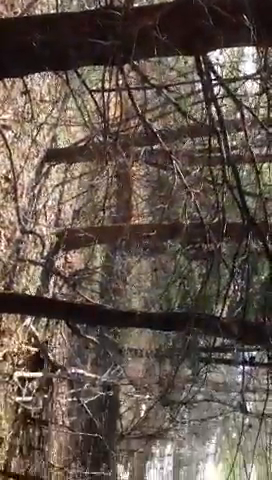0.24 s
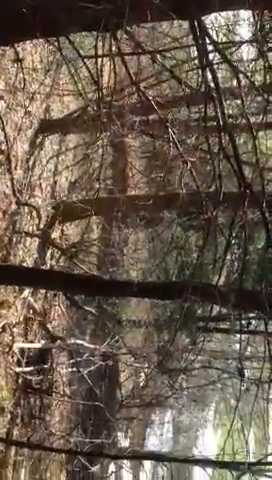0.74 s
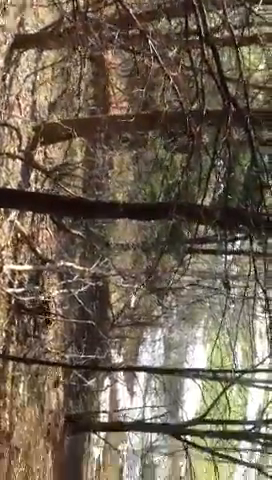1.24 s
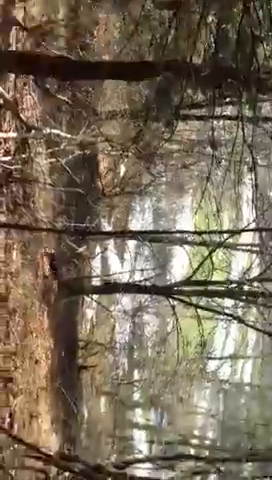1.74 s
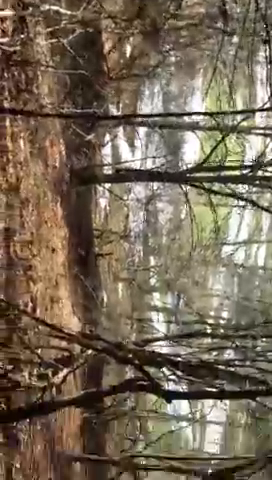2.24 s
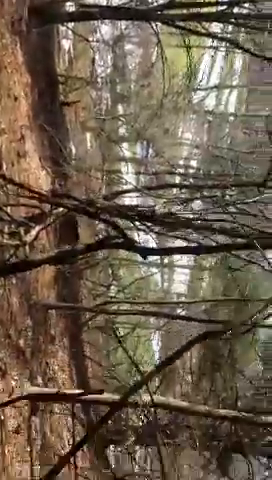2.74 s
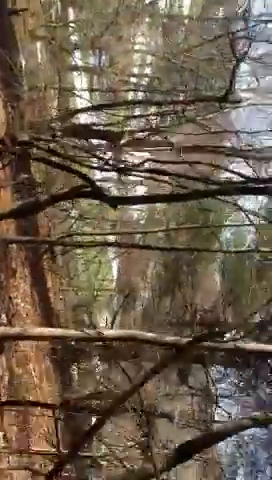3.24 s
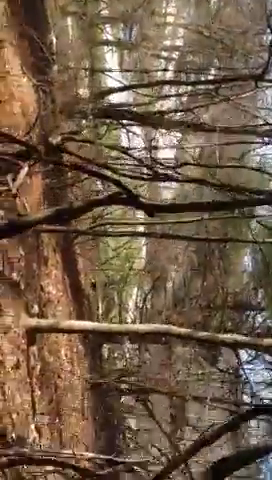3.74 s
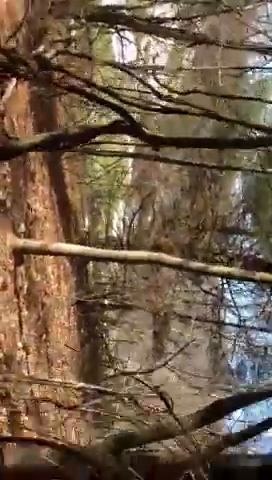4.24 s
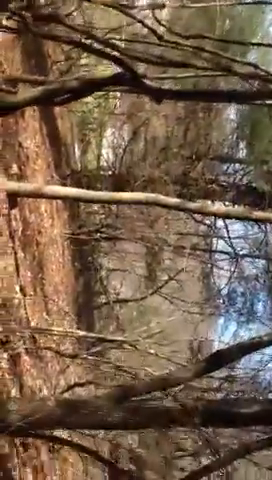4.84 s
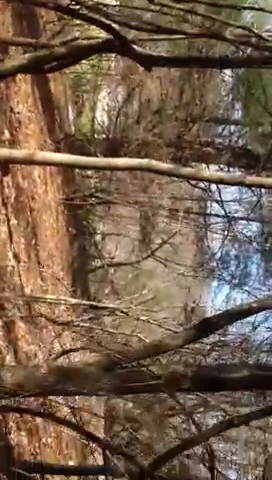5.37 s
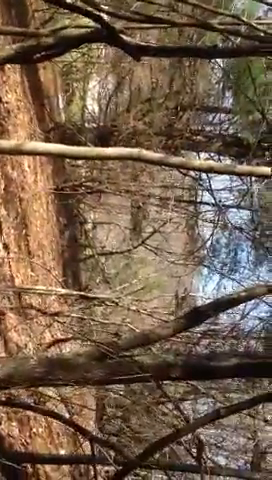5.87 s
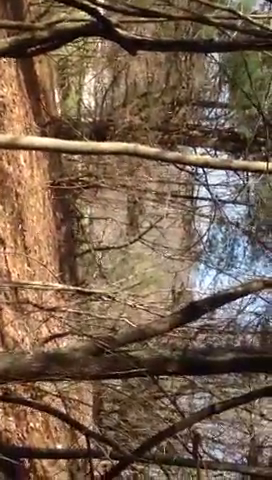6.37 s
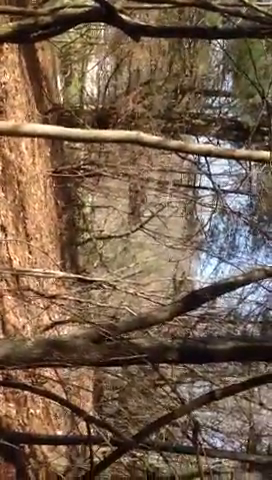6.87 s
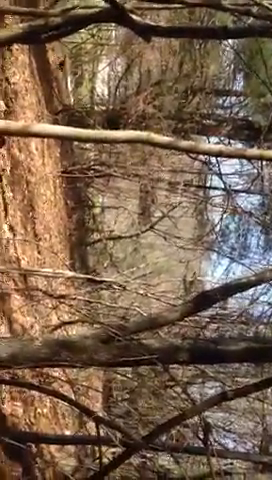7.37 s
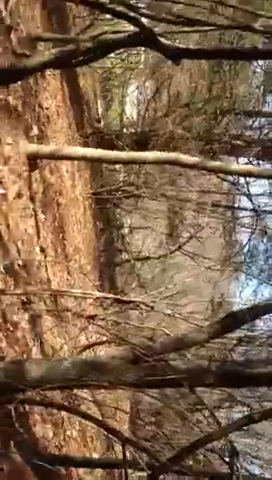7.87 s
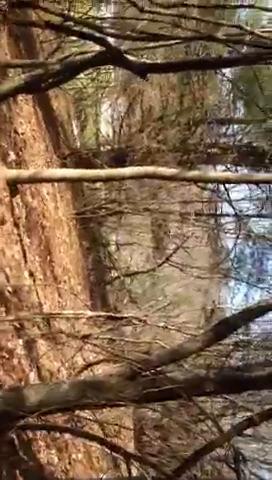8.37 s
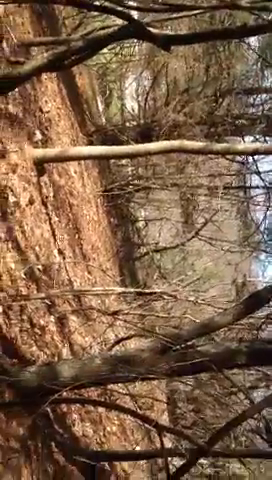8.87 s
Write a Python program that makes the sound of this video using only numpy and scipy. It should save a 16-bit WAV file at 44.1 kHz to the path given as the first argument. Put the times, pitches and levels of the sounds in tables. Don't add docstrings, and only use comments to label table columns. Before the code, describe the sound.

In quiet woods, feet rustle dry leaves close to a hand-held phone. Some way off, a hound bursts into quick yelps that break into a rougher, lower voice, smeared by echoes off trunks. Loud crunches and twig snaps cut across the baying, then thin out to near silence. Late on, sharp finger clicks and dull case knocks land right at the microphone, with another brief cluster of several hounds calling.

```python
import sys
import numpy as np
from scipy import signal
from scipy.fft import rfft, irfft, next_fast_len
from scipy.io import wavfile
from scipy.ndimage import map_coordinates

SR = 44100
rng = np.random.default_rng(int(sys.argv[2]) if len(sys.argv) > 2 else 0)


def waveform_to_disk(signal):
    frames = np.transpose(np.atleast_2d(signal))
    scaled = np.clip(frames, -1, 1) * 32767
    samples = np.round(scaled).astype(np.int16)
    wavfile.write(sys.argv[1], SR, samples)


def elevation(decibels):
    levels = np.asarray(decibels, float)
    return 10 ** (levels / 20)


N = 401751


def lead_hound():
    # start_s, chest_pitch_hz, level_db, jaw_db (opening: fourth multiple over second)
    yelps = [
        [(2.13, 459, -44, -44), (2.158, 684.7, -47.5, 1), (2.18, 643.5, -33, 4), (2.205, 622.5, -30.5, -1.5),
         (2.232, 581.5, -30.5, -5), (2.25, 526.5, -34.5, -7.5), (2.345, 619.6, -34, -4),
         (2.375, 627, -28.5, -8.5), (2.41, 578.4, -33, -11.5), (2.44, 560.5, -39, -9.5)],
        [(2.44, 574, -33, -0.5), (2.47, 519, -28.5, -2.5), (2.51, 548, -45, -18), (2.53, 537, -58, -16)],
        [(2.67, 577, -34.5, -6), (2.696, 606.4, -28.5, 0), (2.712, 576, -28, -4.5), (2.738, 533.4, -26, -7.5),
         (2.752, 491.5, -39, -1), (2.79, 510, -44, -5), (2.836, 622, -34.5, -1.5), (2.88, 662, -53, -45.5)],
        [(3.14, 517, -50, 7), (3.16, 577.5, -36.5, 1.5), (3.185, 538, -31, 2), (3.205, 550, -33.5, -14.5),
         (3.225, 538, -46, -6), (3.26, 527.5, -39, -17), (3.29, 515, -41, -9), (3.33, 546.5, -34, -11)],
    ]
    # start_s, chest_pitch_hz, level_db, jaw_db
    later_yelps = [
        [(3.345, 593, -46, -25), (3.36, 621, -31, -24), (3.375, 576.3, -38.5, -7), (3.409, 531, -38, -5),
         (3.467, 551.4, -48, -9), (3.531, 488, -34, -6), (3.55, 476, -44, -15)],
        [(3.56, 541.4, -38, -7), (3.59, 561, -36, -6), (3.62, 579.4, -35.5, -10), (3.65, 597.6, -36, -13),
         (3.69, 589, -57, -5), (3.75, 561, -57, -24)],
        [(3.9, 585, -47, -11), (3.93, 569.4, -44.5, 1), (3.975, 555.2, -31.5, -15), (4.055, 503.5, -47.5, -9),
         (4.13, 606, -41.5, -2), (4.19, 633.5, -44, -9), (4.27, 647, -53, -5), (4.36, 617, -58, -12)],
    ]
    # start_s, hold_s, level_db
    chest = [(2.204, .03, -45.5), (2.234, 0.028, -26), (2.447, 0.014, -48.5), (2.712, .03, -43),
             (2.739, 0.04, -46), (3.207, 0.043, -29.5), (3.274, 0.026, -37.5), (3.385, 0.051, -44),
             (3.441, 0.041, -35), (3.463, 0.051, -30.5), (3.533, 0.039, -41), (3.986, 0.03, -33.5),
             (4.039, 0.032, -35.5), (4.095, .012, -45)]
    return hound([*yelps, *later_yelps], chest, 0, [-3, -19, -24], [-25, -34, -28],
                 rasp_db=-5, chest_shake=0.13, wet_db=-4, rough=0.095)


def second_hound():
    # start_s, chest_pitch_hz, level_db, jaw_db
    yelps = [
        [(7.865, 780, -40, -12), (7.9, 643, -35.5, -5), (7.925, 572.6, -36.5, 5), (7.96, 586, -43, 8),
         (8.0, 574, -47, 2), (8.06, 569.5, -56, -8), (8.14, 592, -49, -3)],
        [(3.43, 441.4, -35, -7), (3.455, 476, -33, 3), (3.49, 491, -41, 1)],
    ]
    # start_s, hold_s, level_db
    chest = [(7.915, 0.015, -40), (7.95, 0.17, -47)]
    return hound(yelps, chest, -13, [-5, 0, -18], [-24],
                 rasp_db=-4, chest_shake=0.08, wet_db=-3.5, rough=0.09)


def deep_hound():
    # start_s, chest_pitch_hz, level_db, jaw_db
    yelps = [
        [(7.94, 319.6, -48, 24), (7.99, 325.5, -50.5, 15.5), (8.04, 334.8, -43, 7), (8.11, 322, -39, -7),
         (8.22, 313, -39, -3), (8.25, 328.5, -64, 18), (8.34, 337.2, -49.5, -3), (8.44, 308.5, -48.5, 8.5),
         (8.54, 303.5, -63, 10)],
    ]
    # start_s, hold_s, level_db
    chest = [(8.0, 0.17, -49.5), (8.159, 0.12, -48), (8.29, 0.049, -46.5), (8.37, 0.23, -67)]
    return hound(yelps, chest, -11, [-20, 1, -3, -17, -19], [-10, -18],
                 rasp_db=-6, chest_shake=0.04, wet_db=-4, rough=0.085)


def shrill_hound():
    # start_s, chest_pitch_hz, level_db
    yelps = [
        [(7.853, 765, -41), (7.88, 790, -40), (7.98, 802, -51), (8.03, 770, -54)],
    ]
    return hound(yelps, [], -11, [], [-15, -18, -24], wet_db=-1, rough=0.3)


def far_hound():
    # start_s, chest_pitch_hz, level_db, jaw_db if it moves
    yelps = [
        [(8.465, 501, -45, 6), (8.482, 505, -41.5, 1), (8.522, 512.6, -47, 9.5), (8.574, 535.6, -40.5, -1),
         (8.6, 548, -45, -4), (8.63, 565.4, -46, 3), (8.66, 527.5, -54, 0), (8.69, 526, -46, -7),
         (8.8, 513.5, -59.5, -12)],
        [(4.09, 568, -48), (4.13, 582.4, -43), (4.19, 570, -42), (4.25, 582, -37.5), (4.33, 559, -49.5),
         (4.39, 567, -51)],
    ]
    # start_s, hold_s, level_db
    chest = [(4.135, 0.053, -43.5), (4.22, 0.082, -56)]
    return hound(yelps, chest, -16, [-6], [-16], rasp_db=-2, chest_shake=0.1, wet_db=-4, rough=0.1)


def faint_hounds():
    # start_s, chest_pitch_hz, level_db
    calls = [
        [(4.845, 375, -62), (4.87, 410, -55), (4.895, 425, -60)],
        [(4.895, 380, -58), (4.93, 362, -45), (4.945, 360, -56), (4.985, 345, -62)],
        [(4.9, 205, -60), (4.92, 175, -59), (4.95, 125, -61)],
        [(2.43, 360, -50), (2.455, 345, -48), (2.5, 340, -50), (2.53, 330, -56)],
        [(4.87, 476, -64), (4.9, 499, -58), (4.925, 491, -55), (4.97, 476, -69)],
    ]
    closed = hound(calls[:-1], [], -25, [], [], wet_db=-11)
    return closed + hound(calls[-1:], [], 6, [], [], wet_db=-11)


def hound(calls, chest, mouth_db, odd_db, high_db, rasp_db=0, chest_shake=0, wet_db=0, rough=0.13):
    # hz, level_db
    throat = [(410, -35), (510, 0), (820, 0), (1300, -5), (1800, -6), (2600, -9), (2900, -30), (3600, -42)]
    breath_db = -23
    chest_wander_rad = 0.9
    out = np.zeros(N + 2 * SR)
    for rows in calls:
        s, *cols = np.transpose(rows)
        t = np.arange(s[0], s[-1], 1 / SR)
        hz, yelp_db, *jaw_db = [np.interp(t, s, c) for c in cols]
        over_db = yelp_db + mouth_db + sum(jaw_db)
        chest_db = spells(chest, t, rise_db_per_s=2000, fall_db_per_s=900)

        shake = rough + chest_shake * np.clip(3.0 + (chest_db - yelp_db) / 25, 0, 1)
        phase = 2 * np.pi * np.cumsum(hz) / SR + shake * wobble(200, size=len(t))
        drift = chest_wander_rad * wobble(70, size=len(t))

        levels_db = {2: yelp_db, 4: over_db}
        levels_db.update({2 * k + 1: chest_db + db for k, db in enumerate(odd_db)})
        levels_db.update({2 * k + 6: over_db + db for k, db in enumerate(high_db)})
        lines = 0
        for k, db in levels_db.items():
            gain = elevation(db + 17 * shake * wobble(80, size=len(t)))
            lines = lines + gain * np.sin(k * phase + k % 2 * drift)

        air_bursts = rng.standard_normal(len(t)) * (1 + np.cos(phase))
        rasp_gain = elevation(chest_db + rasp_db) + elevation(yelp_db + breath_db)
        rasp = rasp_gain * coloured(air_bursts, throat)
        edge = np.clip(np.minimum(t - s[0], s[-1] - t) / 0.008, 0, 1)
        call = trees(edge * (np.sqrt(2) * lines + rasp), wet_db)
        out[round(s[0] * SR):][:len(call)] += call
    return out[:N]


def trees(x, wet_db):
    # hz, t60_s
    decay = [(300, .3), (600, .3), (1100, .72), (2500, .42), (6000, .3)]
    sway_ms, flutter_db = 0.12, 3.5
    hz, t, z = signal.stft(rng.standard_normal(SR), SR, nperseg=256)
    fade = elevation(-60 * t / along(decay, hz)[:, None])
    tail = signal.istft(z * fade, SR, nperseg=256)[1][:SR]
    tail *= 1 - np.exp(-np.arange(SR) / (0.005 * SR))
    wet = elevation(wet_db) * signal.fftconvolve(x, tail / np.linalg.norm(tail))
    i = np.arange(len(wet))
    late = i + sway_ms * SR / 1000 * wobble(35, size=len(wet))
    wet = elevation(flutter_db * wobble(45, size=len(wet)) - 1) * np.interp(late, i, wet)
    return wet + np.pad(x, (0, SR - 1))


def spells(rows, t, rise_db_per_s, fall_db_per_s):
    db = np.full(len(t), -120.)
    for s, hold_s, top_db in rows:
        rise_db = rise_db_per_s * np.maximum(s - t, 0)
        fall_db = fall_db_per_s * np.maximum(t - s - hold_s, 0)
        db = np.maximum(db, top_db - rise_db - fall_db)
    return db


def rustle():
    # start_s, crackle_db, far_db (treble lost with distance)
    bed = [(0, -97, 2), (.5, -52, 4), (.56, -51, 2.5), (1.5, -48, 4), (1.62, -52.5, 3), (2.2, -56, 0),
           (2.75, -59.5, 6), (2.999, -39.5, -3.5), (3.349, -47.5, -0.5), (3.9, -48, 2.5),
           (4.0, -36.5, -1.5), (4.5, -49, -2), (4.66, -63, 3), (5.2, -53.5, -3), (5.75, -59.5, -2),
           (6.55, -63, -4), (7.05, -73.5, -24), (7.3, -59, -2.5)]
    # hz, db_per_hz
    leaf_colour = [(530, -13.5), (900, -10), (1150, -7), (1430, -6.5), (2160, -5), (2490, -5), (3720, -5.5),
                   (5500, -3.5), (8410, -2), (9930, -4), (13700, 0), (15200, -7.5)]
    # hz, db_per_hz
    swish_colour = [(24, -74), (40, -36.5), (188, -1), (329, -1.5), (503, 4.5), (622, 3.5), (830, -3.5),
                    (1500, -21), (1950, -35.5), (3300, -120)]
    # hz, db_per_hz
    air_colour = [(24, -53), (40, -28), (146, -3), (206, -4), (307, -7), (394, -6.5), (789, -13.5),
                  (1330, -17.5), (4600, -18.5), (7000, -16), (10000, -23), (13500, -17.5), (15200, -20)]
    bed_ends_s, air_db = 7.37, -63.5
    t = np.arange(N) / SR
    s, bed_db, far_db = np.transpose(bed)
    bed_db, far_db = np.interp(t, s, bed_db), np.interp(t, s, far_db)
    level = np.sqrt(elevation(2 * bed_db) * (t < bed_ends_s) + footfalls(t))

    clumps = elevation(0.93 * wobble(25) + 1.17 * wobble(70) + 1.2 * wobble(300))
    break_db = np.minimum(4 * rng.exponential(size=N), 15)
    breaks = (rng.random(N) < 0.015) * elevation(break_db) * rng.standard_normal(N)
    grain = rng.standard_normal(N) + 0.29 * unit(breaks)
    crackle = unit(clumps * coloured(grain, leaf_colour))
    middle = filtered(crackle, lambda hz: 1 / (1 + (hz / 4200) ** 6))
    hollow = filtered(crackle, lambda hz: elevation(-9.5) / (1 + ((hz - 2500) / 300) ** 2))
    crackle = crackle - middle + elevation(far_db) * (middle + elevation(3.7 * wobble(14)) * hollow)

    swish_gain = elevation(-15.5 + far_db) * (level / elevation(-52.5) + 1e-3) ** -0.089
    swish_noise = coloured(rng.standard_normal(N), swish_colour)
    swish = unit(np.sqrt(clumps) * elevation(0.35 * wobble(16)) * swish_noise)
    air = elevation(air_db + 1.3 * wobble(1.6)) * coloured(rng.standard_normal(N), air_colour)
    return level * (elevation(2.5) * crackle + swish_gain * swish) + air


def footfalls(t):
    # peak_s, level_db, length_s
    steps = [(0.097, -56, 0.17), (0.298, -53, 0.025), (0.404, -55, 0.037), (0.54, -47.5, 0.017),
             (0.744, -47.5, 0.028), (0.833, -51, 0.025), (1.142, -43.5, 0.039), (1.27, -42, 0.03),
             (1.466, -49.5, 0.031), (2.23, -49.5, 0.34), (3.013, -36.5, 0.029), (3.079, -36, 0.014),
             (3.289, -26, 0.034), (3.575, -43, 0.073), (3.738, -41.5, 0.024), (3.952, -39, 0.029),
             (4.045, -30, 0.024), (4.162, -34.5, 0.026), (4.295, -33.5, 0.044), (4.455, -33, 0.073),
             (4.514, -32, 0.04), (4.791, -48.5, 0.058), (4.903, -44.5, 0.03), (5.06, -46, 0.079),
             (5.179, -45.5, 0.021), (5.326, -50.5, 0.016), (5.392, -50, 0.016), (5.84, -57.5, 0.016),
             (5.984, -52.5, 0.035), (6.116, -51.5, 0.046), (6.177, -57.5, 0.018), (6.251, -55, 0.05),
             (6.393, -53, 0.021), (6.52, -58, .03), (7.558, -63, 0.043), (7.63, -64, .02),
             (7.854, -64, 0.092), (7.97, -63, 0.033), (8.085, -61.5, 0.012), (8.247, -63, 0.033),
             (8.43, -62, 0.1), (8.53, -62, 0.045), (8.93, -64.5, 0.047), (9.09, -76.5, .02)]
    rise_over_fall, drop_db = 0.86, 8
    power = 0
    for s, db, length_s in steps:
        u = (t - s) / length_s
        power = power + elevation(2 * (db - drop_db * np.maximum(u, -u / rise_over_fall)))
    return power


def twigs():
    # start_s, peak_db, body_db
    snaps = [(0.0662, -37, -18), (0.5342, -27, -18), (1.1293, -25, -20), (1.2531, -31, -11),
             (2.9404, -28, -8), (2.9721, -20, -28), (3.0454, -27, -24), (3.0629, -26, -20),
             (3.0774, -14, -13), (3.0834, -22, -22), (3.1004, -20, -24), (3.1108, -21, -35),
             (3.1298, -18, -13), (3.134, -27, -20), (3.1607, -26, -12), (3.9928, -20, -17),
             (4.15, -17, -16), (4.1634, -18, -13), (4.4724, -16, -23), (4.5084, -18, -18),
             (4.5194, -21, -16), (4.5644, -25, -14), (4.5844, -32, -13), (4.7865, -24, -17),
             (5.02, -33, -16), (5.6331, -43, -22), (5.896, -31, -24), (6.0462, -40, -24),
             (6.1294, -36, -14), (0.2788, -41, -18), (0.3815, -39, -18), (0.7901, -33, -18),
             (1.1159, -30, -18), (1.7449, -37, -18), (1.7699, -32, -18), (1.8193, -37, -18),
             (5.6844, -44, -18), (5.7821, -40, -18), (5.84, -42, -18), (5.9627, -39, -12),
             (6.3883, -41, -14), (8.606, -40, -14)]
    out, t = np.zeros(N + SR), np.arange(SR // 50) / SR
    for s, db, body_db in snaps:
        note = np.sin(2 * np.pi * rng.uniform(1500, 2300) * t)
        wood = elevation(body_db + 5) * burst(t, 0.00045) * note
        crack = snap(burst(t, 0.00025), wide=1.1)
        out[round(s * SR) + 20:][:len(t)] += elevation(db - 1.5) * (crack + wood)
    return out[:N]


def puffs():
    # centre_s, level_db, band_hz, length_s
    scrapes = [(0.068, -53, 5000, 0.01), (0.404, -55.5, 2520, 0.027), (.535, -54, 2200, .008),
               (.74, -57, 2500, .02), (.74, -61, 600, .03), (0.848, -54, 2540, 0.035),
               (0.931, -57.5, 584, 0.036), (.99, -55, 2600, .008), (1.056, -50, 5000, 0.006),
               (1.085, -60, 580, .01), (1.152, -54, 550, 0.029), (1.27, -48.5, 2500, 0.025),
               (1.275, -53, 580, 0.022), (1.284, -58, 170, 0.027), (1.35, -59, 560, .03),
               (1.47, -57, 560, 0.06), (2.3, -56, 165, 0.018), (2.78, -50, 1550, .05),
               (2.855, -50, 520, 0.009), (3.29, -49, 172, 0.027), (4.79, -58, 480, .012),
               (5.03, -57, 1600, .012), (5.965, -63, 2000, .012), (6.1, -65, 3100, .01),
               (6.38, -65, 3000, .01), (6.394, -63, 2200, 0.012), (7.29, -66, 500, .01),
               (7.396, -54, 298, 0.012), (7.436, -51.5, 3270, 0.034), (7.54, -64, 2100, 0.014),
               (8.303, -62, 332, .08), (8.55, -71.5, 2940, 0.15), (8.581, -66, 300, 0.058),
               (8.961, -65.5, 1310, 0.077)]
    width = 0.12
    out = np.zeros(N + SR)
    for s, db, hz, length_s in scrapes:
        t = np.arange(-2 * length_s, 2 * length_s, 1 / SR)
        noise = rng.standard_normal(len(t))
        band = filtered(noise, lambda f: 1 / (1 + ((f - hz) / (width * hz)) ** 2))
        start = round((s - 2 * length_s) * SR)
        out[start:][:len(t)] += elevation(db) * np.exp(-(t / length_s) ** 2) * unit(band)
    return out[:N]


def ticks():
    # start_s, snap_db, bright_db, click_db, click_hz
    taps = [(5.2976, -57, 1.5, -35, 1420), (7.3736, -8.5, -4, -12.5, 2000), (7.3794, -26.5, -6, -29, 2840),
            (7.3836, -44, 8, -31, 2300), (7.469, -46, -2, -27.5, 2520), (7.4894, -47, 4, -33.5, 2500),
            (7.922, -9, -3, -28, 3500), (8.387, -25, -9, -32, 3150), (8.3861, -15.5, -11.5, -18.5, 1700),
            (8.8102, -8, -7.5, -21, 2240), (9.0458, -26.5, -16, -20, 1820), (9.0473, -68, 3, -27, 2500)]
    # start_s, thump_db, thump_hz
    thumps = [(7.359, -40, 393), (7.3746, -18.5, 720), (7.3805, -25, 750), (7.384, -24.5, 726),
              (7.471, -22, 700), (7.4898, -43, 600), (7.552, -41.5, 237), (7.6457, -52, 510),
              (7.922, -21, 500), (8.3866, -21.5, 500), (8.424, -36, 253), (8.8103, -14, 307),
              (9.0458, -24.5, 790), (9.0474, -29, 223)]
    # hz, level_db, share (of bright_db)
    shell = [(6880, -2, 0.18), (8880, -11, 0.41), (11620, -0.5, 1), (13700, -6, 1.5), (5360, -16, 0),
             (3410, -13, 0.2)]
    out, t = np.zeros(N + SR), np.arange(SR // 20) / SR
    hz, db, share = np.transpose(shell)[:, :, None]
    for s, snap_db, bright_db, click_db, click_hz in taps:
        detune, phase = rng.standard_normal((2, len(shell), 1))
        modes = np.sin(2 * np.pi * hz * (1 + 0.019 * detune) * t + 3 * phase)
        ring = np.sum(elevation(db - 3 + share * bright_db) * modes, axis=0)
        crack = np.exp(-((t - 0.0006) / 0.00038) ** 2) * ring + 0.059 * snap(burst(t, 0.0013))
        click = elevation(click_db) * burst(t, 0.00022) * np.sin(2 * np.pi * click_hz * t)
        out[round(s * SR):][:len(t)] += elevation(snap_db) * crack - click
    for s, thump_db, thump_hz in thumps:
        cycles = thump_hz * (0.84 * t + 0.00042 * (1 - np.exp(-t / 0.0004)))
        swell = burst(t, 0.00093 * (550 / thump_hz) ** 0.31)
        out[round(s * SR):][:len(t)] += elevation(thump_db) * swell * np.cos(2 * np.pi * cycles)
    return filtered(out[:N], lambda f: (1j * f / (90 + 1j * f)) ** 2)


def rub():
    # start_s, hold_s, level_db
    slides = [
        (7.374, 0.089, -44),
        (7.784, 0.022, -55.5),
    ]
    # hz, db_per_hz
    skins = [
        [(88, -64), (150, -7.5), (331, -2.5), (750, -6), (1410, -16), (3300, -12), (4680, -26.5), (6880, -15.5),
         (11600, -21), (15200, -27.5)],
        [(88, -50), (150, -8.5), (1190, -7.5), (1920, -5.5), (4960, -23), (15200, -26)],
    ]
    t = np.arange(N) / SR
    out = np.zeros(N)
    for slide, skin in zip(slides, skins):
        level_db = spells([slide], t, rise_db_per_s=2300, fall_db_per_s=450) + wobble(150)
        out += elevation(level_db) * coloured(rng.standard_normal(N), skin)
    return out


def snap(shape, wide=0):
    noise = shape * rng.standard_normal(len(shape))
    x = filtered(noise, lambda f: ports(f) + wide * 1j * f / (8000 + 1j * f))
    return x / np.abs(x).max()


def ports(f):
    # centre_hz, width_hz, level_db
    case = [(6560, 1300, -0.5), (13300, 3500, -9)]
    total = 0
    for k, (c, w, db) in enumerate(case):
        total = total + (-1) ** k * elevation(db) * 1j * f * w / (c * c - f * f + 1j * f * w)
    return total


def burst(t, seconds):
    return t / seconds * np.exp(1 - t / seconds)


def unit(x):
    return x / np.sqrt(np.mean(x ** 2) + 1e-20)


def along(points, hz):
    f, v = np.transpose(points)
    return np.interp(np.log(hz + 1), np.log(f + 1), v)


def wobble(rate_hz, size=N):
    knots = rng.standard_normal(int(size * rate_hz / SR) + 4)
    return map_coordinates(knots, [np.arange(size) * rate_hz / SR])


def filtered(x, response):
    m = next_fast_len(len(x) + 8192)
    return irfft(rfft(x, m) * response(np.fft.rfftfreq(m, 1 / SR)), m)[:len(x)]


def coloured(x, spectrum):
    return unit(filtered(x, lambda hz: elevation(along(spectrum, hz))))


def scene():
    pack = lead_hound() + second_hound() + deep_hound()
    pack += shrill_hound() + far_hound() + faint_hounds()
    leaves = rustle() + twigs() + puffs()
    fingers = ticks() + rub()
    return (pack + leaves + fingers)[None]


def band_limit(x):
    return signal.sosfilt(signal.butter(12, 16560, fs=SR, output="sos"), x)


def record(dry):
    def microphone(hz):
        bass = (1j * hz / (85 + 1j * hz)) ** 3
        return bass * np.where(hz < 15400, 1, elevation(-34.0))

    heard = filtered(dry[0], microphone)
    return band_limit(heard[None])


dry = scene()
out = record(dry)
waveform_to_disk(out)
```